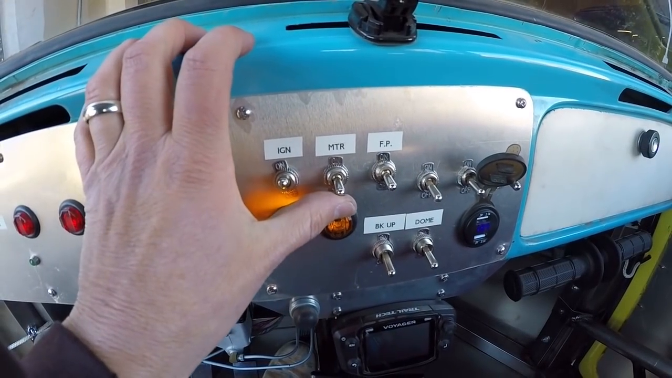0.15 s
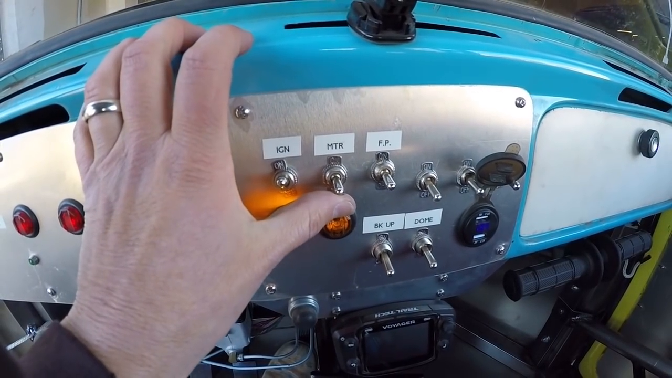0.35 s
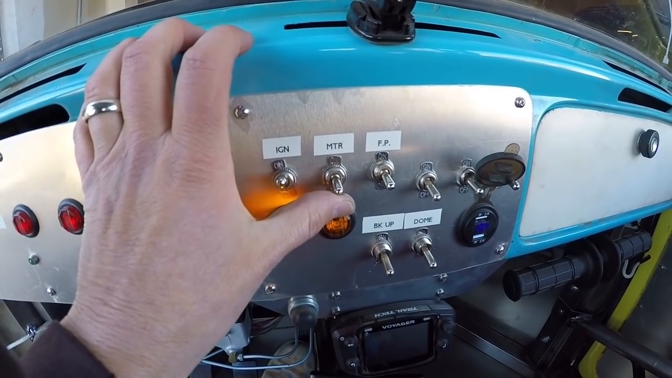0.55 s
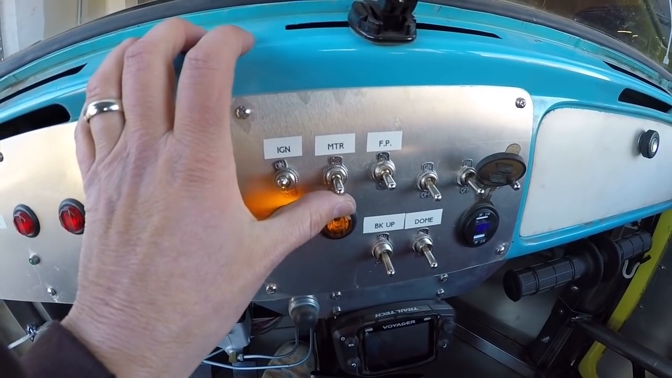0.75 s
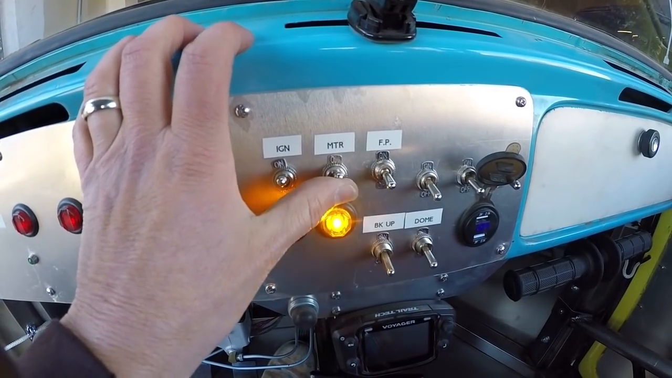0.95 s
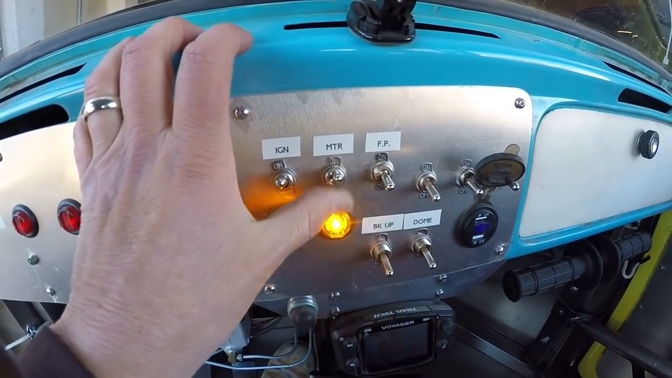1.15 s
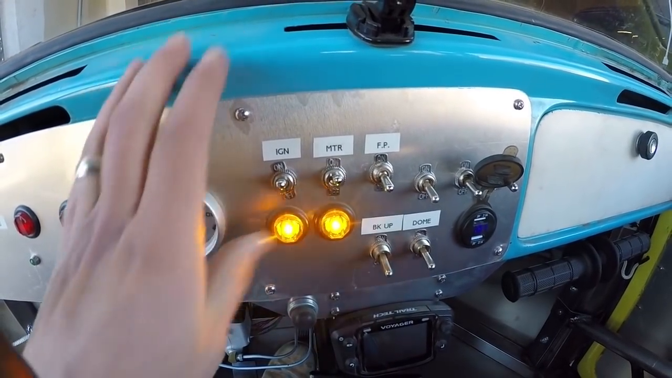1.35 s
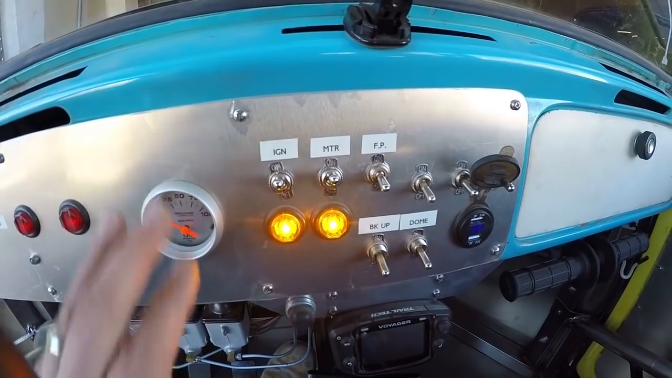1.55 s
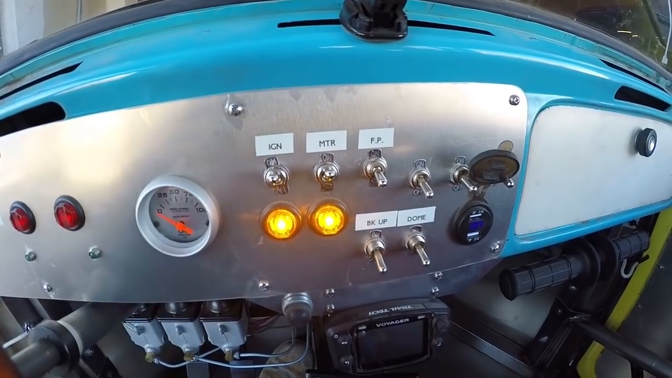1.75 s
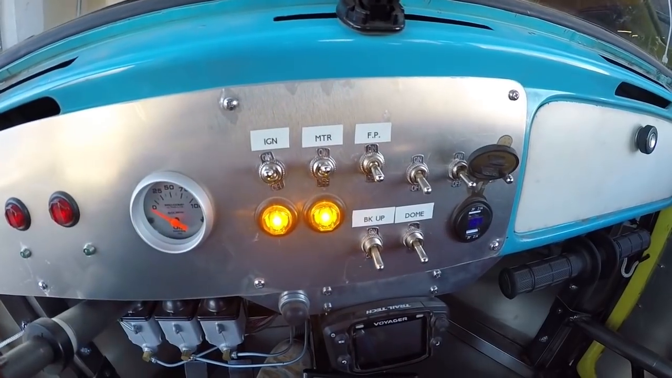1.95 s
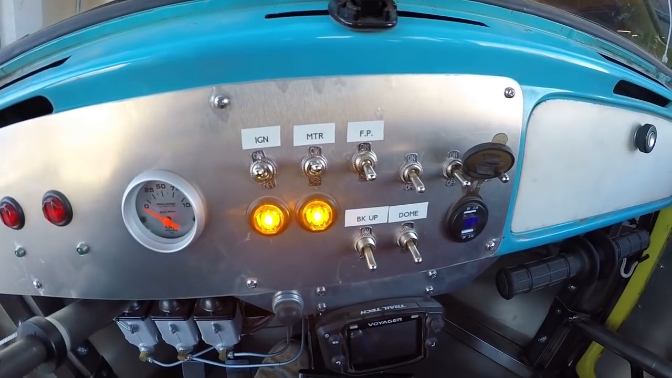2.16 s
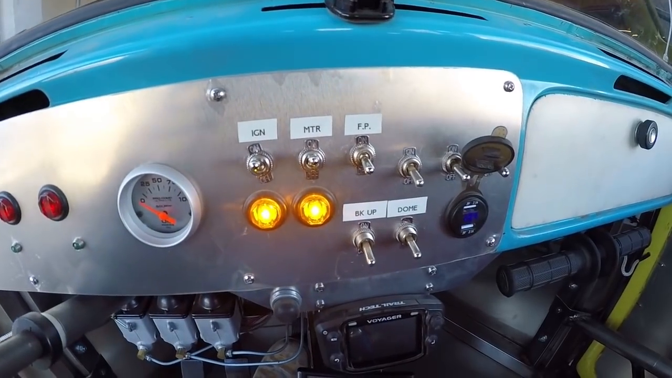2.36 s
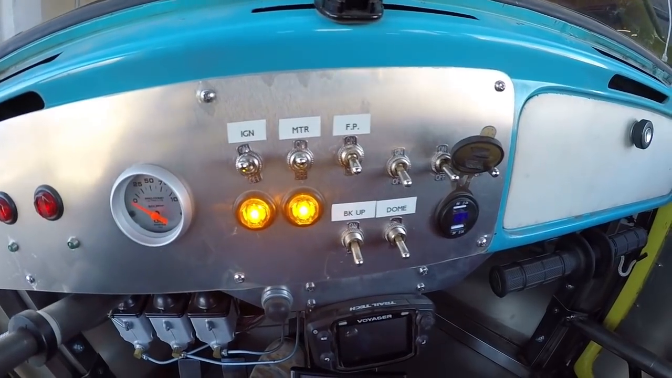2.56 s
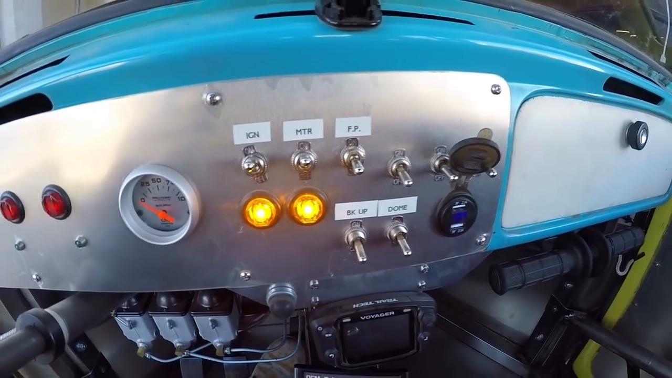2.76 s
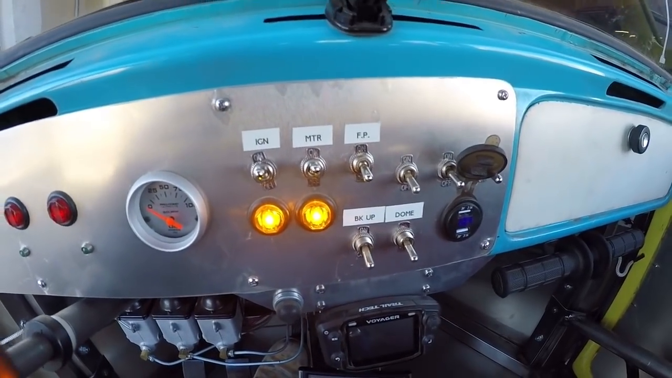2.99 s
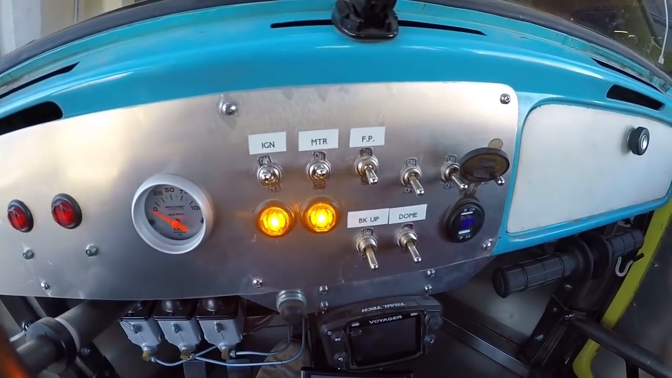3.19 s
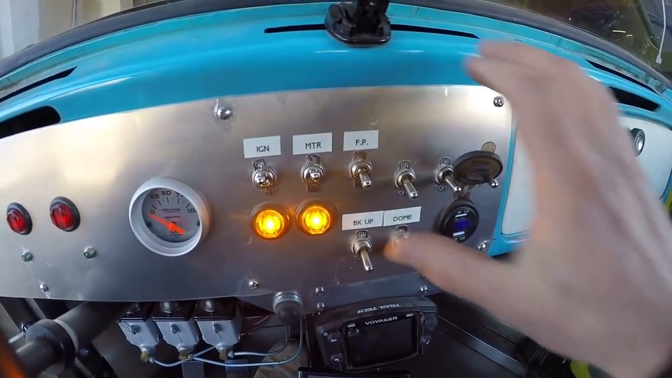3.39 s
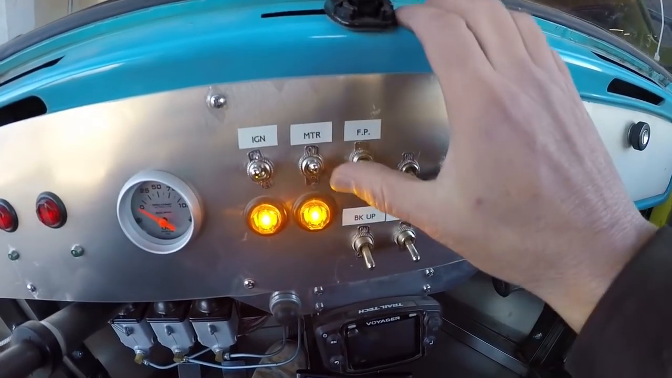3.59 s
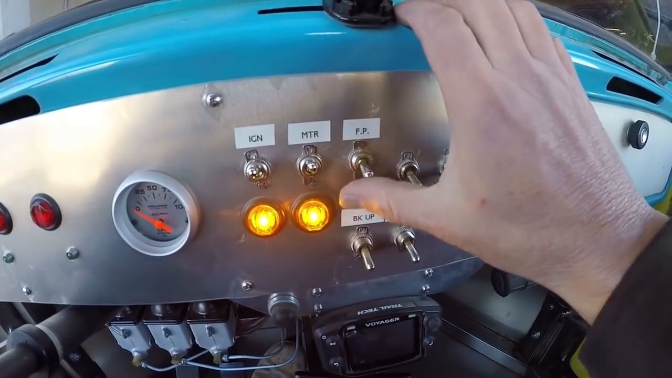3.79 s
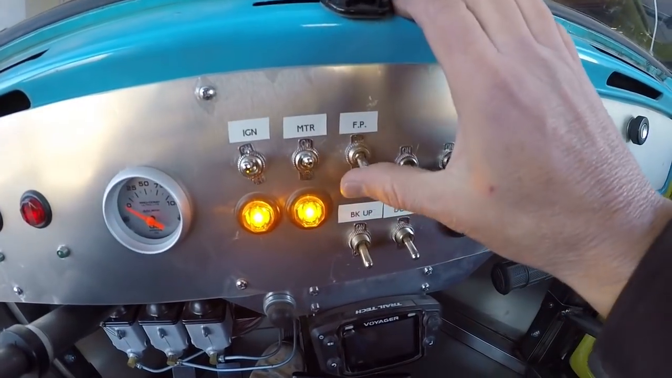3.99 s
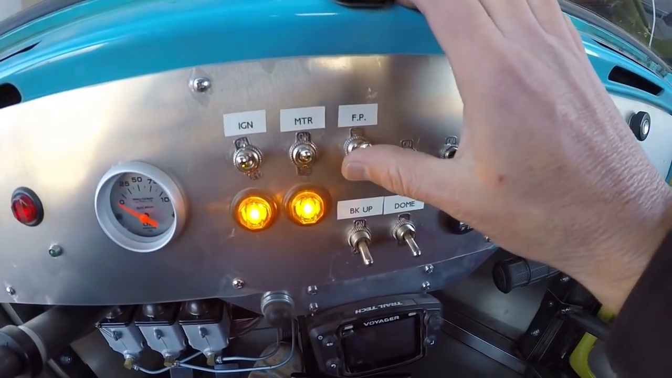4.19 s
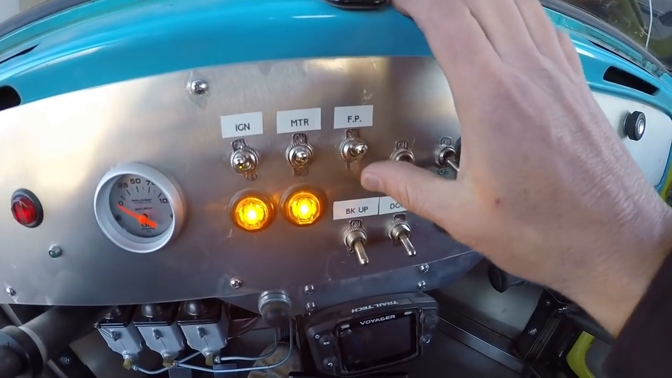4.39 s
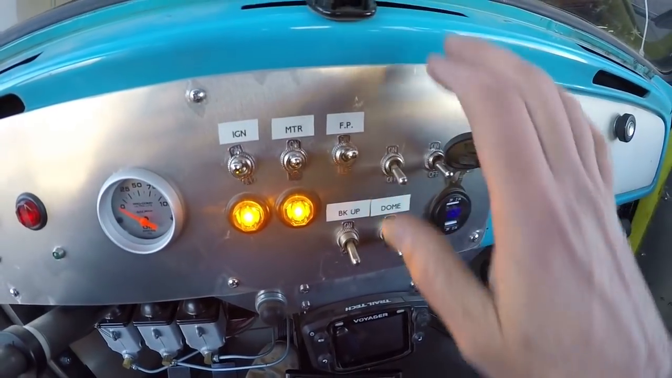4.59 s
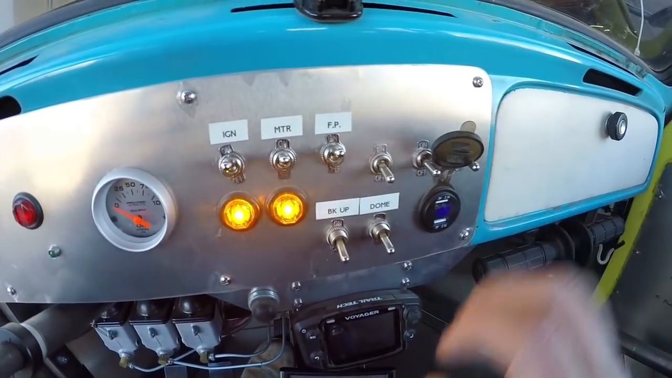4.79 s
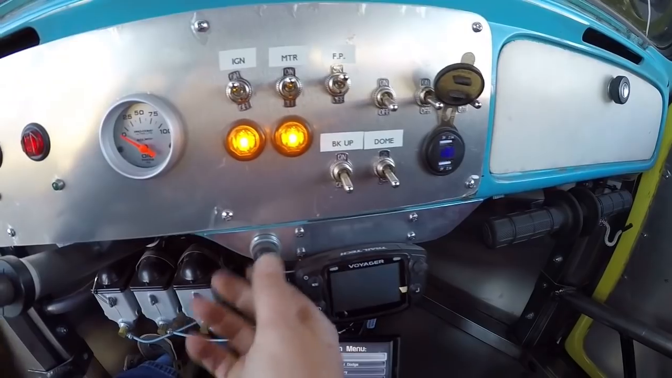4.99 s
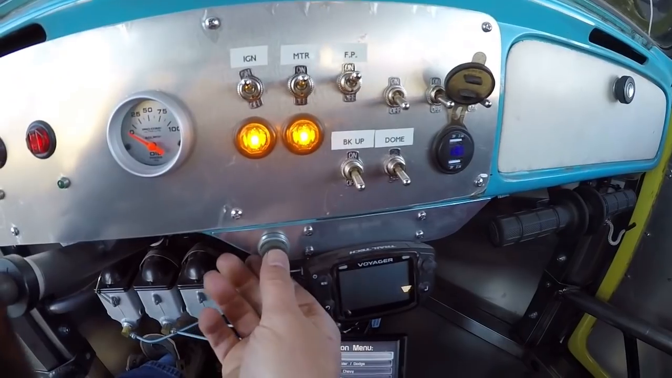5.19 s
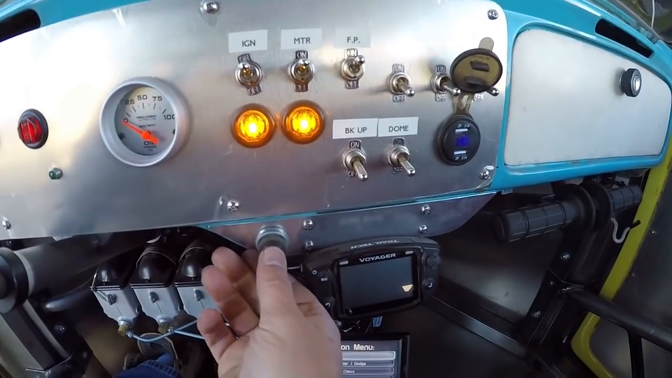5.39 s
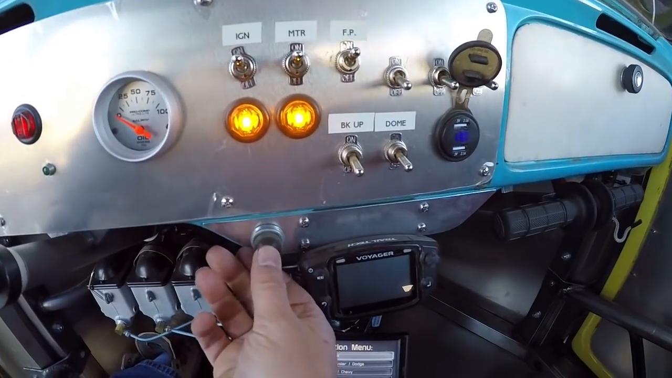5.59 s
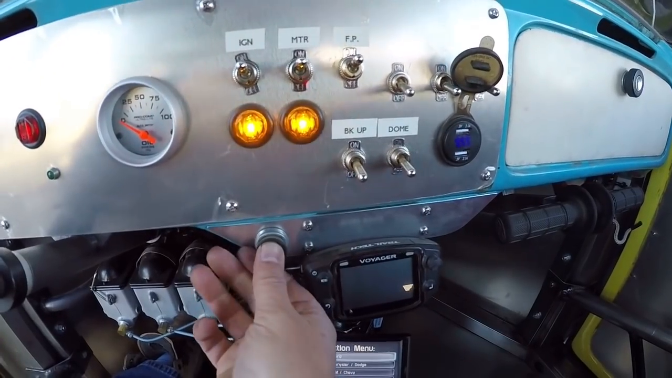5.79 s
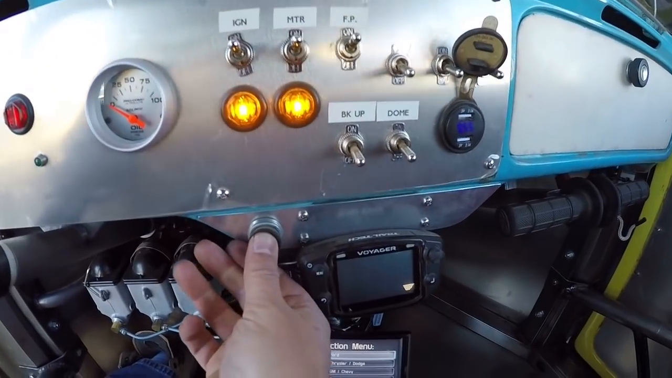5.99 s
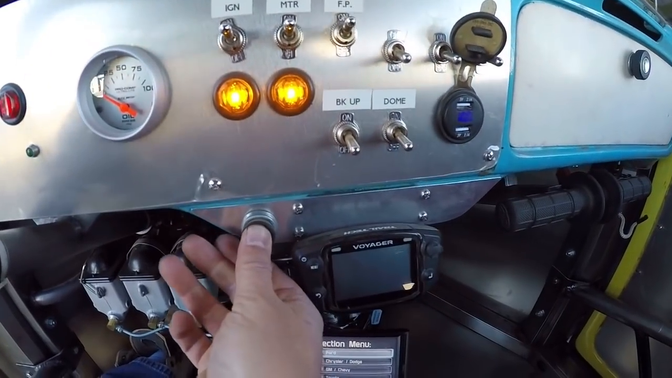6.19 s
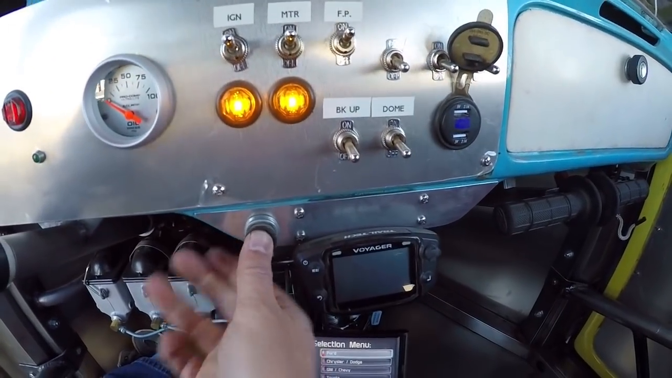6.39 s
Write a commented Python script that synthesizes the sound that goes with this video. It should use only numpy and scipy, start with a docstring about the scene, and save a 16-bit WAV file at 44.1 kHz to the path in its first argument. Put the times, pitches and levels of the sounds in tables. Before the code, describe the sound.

Close inside a small bare-metal car cabin, low rumble and soft body bumps surround a sharp toggle snap with metallic ring. After quiet shuffling, a second switch clicks and a fuel pump hums, whines and hisses, its pitch dropping slightly under pressure. Finally the starter slams in, gears howl in quick waves, and the engine catches with heavy booming that overloads the microphone.

```python
"""First a low air rumble and soft bumps: a driver moves about in a small bare-metal car.
Toggle switches snap on the dash, each a burst of coloured noise with ringing tones.
The second starts a fuel pump, whose hum and whine follow its shaft over hissing noise.
Then the starter slams in, its gears howl up and down with each compression, and the engine catches:
pressure pulses set the body booming, so loud that the microphone clips."""
import sys
import numpy as np
from scipy import signal
from scipy.fft import rfft, irfft, next_fast_len
from scipy.io import wavfile
from scipy.ndimage import uniform_filter1d, map_coordinates

SR = 44100
rng = np.random.default_rng(int(sys.argv[2]) if len(sys.argv) > 2 else 0)


def pcm_store(signal):
    """Save signal as 16-bit PCM."""
    levels = np.round(np.clip(np.atleast_2d(signal), -1, 1) * 32767)
    wavfile.write(sys.argv[1], SR, levels.astype(np.int16).T)


N = 284445
TIME = np.arange(N) / SR
# the starter turns from CRANK_S until the engine catches at CATCH_S
CRANK_S, CATCH_S, CATCH_LENGTH_S = 5.72, 6.27, 0.023

# In every spectrum below, level_db is the relative strength per Hz of bandwidth.
# In every list of ringing tones, t60_s is the time a tone takes to fall by 60 dB.

# pushes on the body from the starter and the compressions: [start_s, level_db, length_s]
KICKS = [(5.69, -8, 0.017), (5.714, -7.5, 0.0055), (5.745, -3.5, 0.0064), (5.79, -3, .009),
         (5.918, 8, 0.026), (6.022, -3, 0.023), (6.148, 1, .02), (6.25, -5, 0.021)]
# pushes from the first firings: [start_s, level_db, length_s]
FIRINGS = [(6.305, 10.9, 0.014), (6.352, 7.6, 0.01), (6.396, 7, 0.0067), (6.428, 5.1, 0.0077)]
# ringing tones of the body and exhaust: [pitch_hz, level_db, t60_s]
BOOM = [(39.8, -8, 0.25), (66, -9.5, 0.075), (107.4, -4, 0.14), (154, -3.5, 0.083), (310, -27, .08)]
# the engine shakes on its mounts: level while cranking, extra once it has caught
SHAKE_DB, SHAKE_CAUGHT_DB = -16, 8.5


def engine():
    """Compressions and then firings set the body booming; the exhaust barks as the engine catches."""
    pushes = pressure_pulses(KICKS) + pressure_pulses(FIRINGS)
    boom = signal.fftconvolve(pushes, ringing(BOOM))[:N]
    boom = high_pass(boom, 24)

    shake = noise([(30, -5.5), (42, -2.5), (65, -6.5), (105, -10), (130, -16)])
    shake = even_out(shake, SR // 12)
    shake_db = SHAKE_DB + SHAKE_CAUGHT_DB * fade_in(CATCH_S, 0.037)

    bark_spectrum = [(150, 0), (420, 0), (950, -5), (2000, -17), (8000, -29)]
    bark = blow(bark_spectrum, t60=0.17, tail_db=-13, rise=0.0038)
    add(boom, 6.424, from_db(-6.5) * bark)
    return boom + fade_in(5.69, .04) * from_db(shake_db) * shake


def pressure_pulses(rows):
    """Smooth pushes of equal area, each scaled by its level."""
    out = np.zeros(N)
    for start_s, level_db, length_s in rows:
        push = np.hanning(int(length_s * SR))
        add(out, start_s, from_db(level_db) * push / push.sum())
    return out


# tones of the gear howl: [multiple of the tooth-mesh rate, level_db]
MESH_ORDERS = [(.5, -14), (1, 1), (1.12, -7.5), (1.5, -15), (1.83, -14), (2, -12), (3, -14), (4, -19)]
# resonances of the bell housing round the gears: [pitch_hz, width_hz, level_db]
HOUSING = [(587, 41, 3), (664, 55, 1.5), (743, 50, -3), (1152, 89, -1.5), (1282, 79, 0), (1474, 116, -2),
           (1690, 60, -1.5), (1970, 42, -5), (2150, 140, -1.5), (2860, 300, -5), (3740, 490, -8),
           (4520, 220, -3)]
# spectra of the block's rumble, the gear clatter and the harsh rasp: [pitch_hz, level_db]
BLOCK = [(53, -38), (90, -6), (118, -0.5), (231, -7.5), (313, -5), (355, -9), (415, -6.5), (534, -9.5),
         (575, -4), (672, -7), (820, -15), (940, -18.5), (1100, -13), (1430, -34), (2420, -120)]
CLATTER = [(530, -39), (900, -15), (972, -14), (1160, -6), (1260, -5), (1510, -3.5), (1570, -10),
           (2140, -6.5), (2370, -20), (2820, -15), (3740, -23), (4800, -22.5), (7000, -33.5), (9100, -65),
           (15400, -120)]
RASP = [(2940, -2), (5000, -3.5), (5610, -11), (8150, -9.5), (10400, -18), (13900, -20), (15700, -30)]
# the solenoid's spectrum: [pitch_hz, level_db]
SOLENOID = [(47, -23), (80, -3), (189, -11), (315, -10.5), (993, -13.5), (2010, -8.5), (2570, -13),
            (5440, -13), (10100, -28.5), (14700, -23), (15700, -30)]
# ringing tones of the solenoid and of the starter mount: [pitch_hz, level_db, t60_s]
SOLENOID_MODES = [(1768, -9.5, 0.15), (2104, -13, 0.23)]
ENGAGE_MODES = [(129, -5, 0.34), (164.3, -2.5, 0.17), (242, -16, 0.093)]
# the pinion grates forward into the ring gear: [start_s, level_db, upper_edge_hz]
PINION = [(5.678, -21.5, 7000), (5.689, -15.5, 9000), (5.696, -10, 7000)]
# spectrum of light metal knocks, shared by the pinion and the dash: [pitch_hz, level_db]
KNOCK_COLOUR = [(200, -1), (400, -2), (900, -1.5), (2800, -4), (6000, -10.5), (15000, -15.5)]


def starter():
    """The pinion slams in; gear teeth howl and clatter while the block turns over."""
    mesh_hz, howl_db, block_db, clatter_db, rasp_db = cranking()
    teeth = np.cumsum(mesh_hz * (1 + .032 * drift(400))) / SR  # teeth met so far
    howl = sum(from_db(db + 3.3 * drift(200)) * np.sin(2 * np.pi * k * teeth) for k, db in MESH_ORDERS)
    # each sweep sets one housing resonance after another howling
    howl = resonate(howl * from_db(howl_db) * fade_in(5.71, 0.018), HOUSING)
    howl = panels(howl, t60=0.17, wet=0.66)

    block = rms_one(panels(noise(BLOCK), t60=.3, wet=1.22))
    block = from_db(block_db) * block * fade_in(5.735, 0.015)

    # the noise swells and dips once every two teeth
    swell = rms_one((1 + 0.57 * np.cos(np.pi * teeth)) * from_db(2 * drift(200)))
    clatter = panels(swell * rng.standard_normal(N), t60=0.13, wet=1.13)
    clatter = from_db(clatter_db) * coloured(clatter, CLATTER)
    rasp = from_db(rasp_db) * panels(swell * noise(RASP), t60=.06, wet=0.72)

    slam = snap(5.7045, SOLENOID, SOLENOID_MODES, level_db=0.5, ring_db=1.5, travel=0.00313,
                lead_db=-5.5, t60=0.11, tail_db=-18, flex_db=-0.5)
    add(slam, 5.714, from_db(2.0) * ringing(ENGAGE_MODES))
    for start_s, level_db, edge_hz in PINION:
        grate = low_pass(blow(KNOCK_COLOUR, t60=0.066, tail_db=-12.5), edge_hz)
        add(slam, start_s, from_db(level_db) * grate)
    return slam + howl + block + (clatter + rasp) * fade_in(CRANK_S, 0.011)


# starter gears run up to speed and are thrown out: [start_s, mean tooth-mesh pitch_hz, howl level_db]
STARTER_SPEED = [(5.70, 250, -45), (5.755, 585, -10), (5.79, 650, -18), (5.83, 745, -16),
                 (5.86, 1140, -8.5), (5.92, 1185, -10), (5.97, 1370, -17), (6.08, 1310, -12.5),
                 (6.28, 1315, -11), (6.33, 1338, -34)]
# once up to speed, each compression slows the gears and loads their teeth
SWING_FROM_S, COMPRESSION_AT_S, COMPRESSION_PERIOD_S = 5.93, 6.165, .104
# share of the speed; louder under load; louder at either end of the swing, where the pitch dwells
SWING_SHARE, LOAD_DB, DWELL_DB = .13, 1.5, 3
# block rumble eases while cranking between surges, and grows as the engine runs up
BLOCK_DB, BLOCK_FADE_DB_PER_S, BLOCK_RUN_UP_DB_PER_S = -15.3, 9, 45
# each kick makes the block rumble surge: dB for a kick of level 0 dB, rise and dying away
SURGE_DB, SURGE_RISE_S, SURGE_T60_S = 6, .025, .6
# clatter: at full speed, per octave of speed, once the engine has caught
CLATTER_DB, CLATTER_DB_PER_OCTAVE, CLATTER_CAUGHT_DB = -16.2, 5, -3.5
SEATING_DB, SEATING_S = 12, .03  # extra clatter while the teeth seat
FULL_MESH_HZ = 1330  # tooth-mesh rate counted as full speed
# rasp: at full speed, per octave of speed, growth from the start of cranking, once the engine has caught
RASP_DB, RASP_DB_PER_OCTAVE, RASP_DB_PER_S, RASP_CAUGHT_DB = -34.5, 7.5, 9.5, 8


def cranking():
    """Tooth-mesh rate (Hz) and levels (dB) of howl, block, clatter and rasp, from speed, load and catch."""
    mean_hz, howl_db = in_time(STARTER_SPEED)
    caught = fade_in(CATCH_S, CATCH_LENGTH_S)
    swing = np.cos(2 * np.pi * (TIME - COMPRESSION_AT_S) / COMPRESSION_PERIOD_S)
    load = fade_in(SWING_FROM_S, 0.0997) * swing
    mesh_hz = mean_hz * (1 - SWING_SHARE * load)
    octaves = np.log2(mesh_hz / FULL_MESH_HZ)
    howl_db = howl_db + LOAD_DB * load + DWELL_DB * (load ** 2 - .5)

    surge = sum(from_db(db - 60 * since(s) / SURGE_T60_S) * fade_in(s, SURGE_RISE_S) for s, db, _ in KICKS)
    block_db = BLOCK_DB + SURGE_DB * surge
    block_db = block_db - BLOCK_FADE_DB_PER_S * since(CRANK_S) + BLOCK_RUN_UP_DB_PER_S * since(CATCH_S)

    seating_db = SEATING_DB * np.exp(-since(CRANK_S) / SEATING_S)
    clatter_db = CLATTER_DB + CLATTER_DB_PER_OCTAVE * octaves + CLATTER_CAUGHT_DB * caught + seating_db
    rasp_db = RASP_DB + RASP_DB_PER_OCTAVE * octaves
    rasp_db = rasp_db + RASP_DB_PER_S * since(CRANK_S) + RASP_CAUGHT_DB * caught
    return mesh_hz, howl_db, block_db, clatter_db, rasp_db


# spectra of the first toggle and of the pump's toggle: [pitch_hz, level_db]
MOTOR_SWITCH = [(47, -29), (80, 0), (216, -6.5), (359, -14), (1020, -6), (1290, -5.5), (1450, -2.5),
                (1610, -6.5), (1930, -2.5), (3270, -4.5), (3580, -7.5), (4360, -6.5), (9250, -22.5),
                (12600, -18), (15700, -28)]
PUMP_SWITCH = [(47, -40), (80, 1), (207, -10.5), (469, -20.5), (638, -11), (870, -20.5), (1290, -11.5),
               (1730, -14), (2100, -9.5), (2350, -15.5), (4180, -10), (5090, -8.5), (6640, -18),
               (7420, -23.5), (15700, -23.5)]
# ringing tones of the two toggles and of the dash panel itself: [pitch_hz, level_db, t60_s]
MOTOR_MODES = [(1068, -21.5, .09), (1540, -19.5, .08), (2120, -22, 0.098), (2606, -20, .08),
               (4350, -14, 0.068)]
PUMP_MODES = [(167, -24.5, 0.31), (1297, -13, 0.076), (1310, -36, .45), (4730, 4, 0.013), (5270, -9, 0.019)]
DASH_MODES = [(154.7, -13, .15), (269.5, 2.5, 0.17), (445, -6.5, 0.16), (542, -12, 0.55),
              (862, -15.5, 0.59)]
# relays and light knocks behind the dash: [start_s, level_db, upper_edge_hz, t60_s]
KNOCKS = [(1.029, -19, 3370, 0.08), (1.134, -31.5, 3400, 0.12), (3.889, -44, 6000, 0.057),
          (4.694, -31, 2800, 0.087)]


def dash():
    """Two toggles, the starter button, and relays and knocks: short noise bursts, most with metal ringing."""
    out = snap(0.96, MOTOR_SWITCH, MOTOR_MODES, level_db=2, ring_db=-1.5, travel=.0018,
               lead_db=-13.5, t60=.06, tail_db=-19, flex_db=-3)
    out += snap(4.0542, PUMP_SWITCH, PUMP_MODES, level_db=-4.0, ring_db=5.0, travel=.0016,
                lead_db=-2.5, t60=0.066, tail_db=-15.5, flex_db=-2)
    button = blow([(400, -6), (4500, -2), (8000, -3), (14000, -8)], t60=0.056, tail_db=-8)
    add(out, 5.663, from_db(-27) * button)
    for start_s, level_db, edge_hz, t60 in KNOCKS:
        rattle = low_pass(blow(KNOCK_COLOUR, t60, tail_db=-6.5), edge_hz)
        add(out, start_s, from_db(level_db) * (rattle + from_db(-3.5) * ringing(DASH_MODES)))
    return out


# tones of the pump's hum: [multiple of the shaft rate, level_db]
PUMP_ORDERS = [(1, 3), (2, -14.5), (3, -23.5), (4, -28.5), (8.18, -29.5), (47, -35), (82, -30), (88, -43),
               (90, -42), (96, -42), (112.2, -35)]
PUMP_VANES, LOW_WHINE_ORDER = 48, 31.2  # multiples of the shaft rate: main whine, fainter lower whine
# spectra of the fuel hiss while the line fills, the hiss under pressure, and the low drone:
# [pitch_hz, level_db]
FUEL_HISS = [(710, -47), (1200, -25), (1600, -22), (2310, -13), (2780, -12), (3090, -10), (4090, -11.5),
             (4810, -11), (4970, -5), (6300, -14), (7480, -10), (12300, -11.5), (15700, -22)]
LOADED_HISS = [(710, -43), (1200, -12), (1770, -20), (2030, -11), (2490, -14.5), (4270, -9), (4660, -8),
               (4970, -13), (10400, -12.5), (13700, -17), (15700, -29)]
PUMP_DRONE = [(65, -20), (110, 0), (130, -14), (219, -11), (264, -24.5), (503, -31), (661, -42), (796, -39),
              (850, -44), (1500, -42.5), (1950, -72), (3300, -120)]
# the pump runs free until the line is full, then slows; the starter drags its supply down
PUMP_ON_S, PUMP_SPIN_UP_S, LINE_FULL_S = 4.06, .015, 4.95
PUMP_FREE_HZ, PUMP_LOAD_DROP_HZ, PUMP_CRANK_DROP_HZ = 97.46, 1.42, 7.7
# base levels of the pump's parts: (running free dB, under pressure dB)
HUM_DB, WHINE_DB, LOW_WHINE_DB, HISS_DB = (-36, -31.7), (-50, -49), (-65, -71), (-49, -51)


def fuel_pump():
    """An unbalanced rotor hums, its vanes whine, fuel hisses; it slows a little once under pressure."""
    pressure = fade_in(LINE_FULL_S, .02)
    spin_up = 1 - .2 * np.exp(-since(PUMP_ON_S) / PUMP_SPIN_UP_S)
    shaft_hz = spin_up * PUMP_FREE_HZ - PUMP_LOAD_DROP_HZ * pressure
    shaft_hz = shaft_hz - PUMP_CRANK_DROP_HZ * fade_in(5.66, 0.11)
    hum_db, whine_db, low_db, hiss_db = [free + (full - free) * pressure
                                         for free, full in (HUM_DB, WHINE_DB, LOW_WHINE_DB, HISS_DB)]

    angle = 2 * np.pi * np.cumsum(shaft_hz * (1 + 0.0004 * drift(30))) / SR
    hum = sum(from_db(db + 2.6 * drift(12)) * np.sin(k * angle) for k, db in PUMP_ORDERS)
    whine = fade_in(PUMP_ON_S, .14) * from_db(whine_db + 1.4 * drift(25)) * np.sin(PUMP_VANES * angle)
    whine += from_db(low_db + 3 * drift(20)) * np.sin(LOW_WHINE_ORDER * angle)

    # the hiss partly repeats on each turn, which gives it a fine buzz
    one_turn = coloured(rng.standard_normal(SR), FUEL_HISS)
    turn_share = angle % (2 * np.pi) / (2 * np.pi)
    buzz = map_coordinates(one_turn, [turn_share * SR / shaft_hz[N * 3 // 4]], order=3)

    # the line resonates; its peaks wander while it fills and change once it is under pressure
    filling = panels(noise(FUEL_HISS), t60=0.032, wet=1.3)
    filling = map_coordinates(filling, [np.cumsum(1 + .012 * drift(7))], order=3)
    loaded = panels(noise(LOADED_HISS), t60=0.034, wet=1.8)
    flow = np.sqrt(1 - pressure) * filling + np.sqrt(pressure) * loaded
    hiss = from_db(hiss_db) * (0.98 * flow + 0.54 * buzz)
    drone = from_db(hiss_db + 14.0) * noise(PUMP_DRONE)  # the flow also shakes the floor pan
    return fade_in(PUMP_ON_S, 0.043) * (from_db(hum_db) * hum + whine + hiss + drone)


# spectrum of the body's rumble: [pitch_hz, level_db]
RUMBLE = [(20, -6), (38, 1.5), (70, -2), (110, -12.5), (180, -25), (350, -41.5)]
# soft bumps of the driver's body: [start_s, peak level_db, upper_edge_hz]
BUMPS = [(.832, -24.5, 168), (1.805, -21.5, 70), (1.921, -16.5, 250), (2.161, -21, 80), (2.377, -21.5, 228),
         (2.497, -21.5, 241), (2.715, -28.5, 190), (2.974, -29, 219.5), (3.236, -25, 217),
         (3.441, -20.5, 180), (3.471, -20.5, 276), (4.77, -21, 200), (4.835, -18.5, 140)]
# hand and sleeve brush the dash: [start_s, length_s, level_db, centre pitch_hz, width_octaves]
# the brushing noise is 18 dB down at twice the width on either side of its centre
BRUSHES = [(1.286, 0.097, -53, 7150, 2.7), (2.57, 0.046, -59.5, 5970, .7), (3.394, .008, -56, 8000, 0.67),
           (3.5, 0.082, -51.5, 6640, 6.6)]
# slips of a brief creak: [start_s, level_db]
CREAK = [(2.841, -41), (2.846, -38), (2.850, -39.5), (2.859, -46)]
# ringing tones of each slip: [pitch_hz, level_db, t60_s]
CREAK_MODES = [(2520, 1, .018), (2850, -2, .012), (3195, 2, .018), (4060, -5, .012)]


def driver():
    """Someone moving in the seat: low noise rumbles and thuds, soft noise brushes, tones creak."""
    out = rocking() * even_out(noise(RUMBLE), SR // 8)
    t = TIME[:SR // 2]
    for start_s, level_db, edge_hz in BUMPS:
        jolt = rng.standard_normal(len(t)) * from_db(-60 * t / 0.08)
        thud = low_pass(low_pass(jolt, edge_hz), edge_hz)  # padding dulls the treble
        add(out, start_s, from_db(level_db) * thud / abs(thud).max())
    for start_s, length_s, level_db, hz, octaves in BRUSHES:
        friction = noise([(hz / 4 ** octaves, -18), (hz, 0), (hz * 4 ** octaves, -18)])
        stroke = np.sin(np.pi * fade_in(start_s, length_s) ** 0.63)
        out += from_db(level_db) * stroke * friction
    for start_s, level_db in CREAK:
        add(out, start_s, from_db(level_db) * ringing(CREAK_MODES) * fade_in(0, .0008)[:SR])
    return out


# the driver shifts in the seat and rocks the body: [start_s, length_s, rumble level_db]
SHIFTS = [(.79, 0.43, -28.5), (1.488, 0.45, -31.5), (2.14, .1, -26.5), (2.32, 0.92, -32.5),
          (3.299, 0.23, -24), (4.036, .82, -29.5)]
SHIFT_ATTACK_S, SHIFT_RELEASE_S = 0.032, 0.097
SITTING_DB = -43  # rumble while the driver keeps still
BUMP_ROCK_DB, BUMP_ROCK_S = -28.5, 0.083  # each bump rocks the body for a moment


def rocking():
    """Strength of the body's rumble: the powers of shifts and bumps add to a quiet base."""
    power = from_db(SITTING_DB) ** 2
    for start_s, length_s, level_db in SHIFTS:
        shift = held(start_s, length_s, SHIFT_ATTACK_S, SHIFT_RELEASE_S)
        power = power + (from_db(level_db) * shift) ** 2
    for start_s, _, _ in BUMPS:
        rock = np.sin(np.pi * fade_in(start_s - .015, BUMP_ROCK_S))
        power = power + (from_db(BUMP_ROCK_DB) * rock) ** 2
    return np.sqrt(power)


# spectrum of the still air in the cabin: [pitch_hz, level_db]
AIR = [(15, -31), (25, 1), (102, -17), (123, -28), (156, -13), (179, -29), (241, -20), (315, -34),
       (381, -30), (555, -36.5), (1350, -40), (1820, -44), (15700, -57)]


def cabin_air():
    """Still air in the cabin: steady noise, mostly low."""
    return from_db(-39.5) * noise(AIR)


def snap(s, spectrum, modes, level_db, ring_db, travel, lead_db, t60, tail_db, flex_db=-5.0):
    """A sprung part lets go with a tick and, after its travel (s), slams into its stop."""
    out = np.zeros(N)
    tick = blow(spectrum, t60=0.012, tail_db=-26.5)
    add(out, s - travel, from_db(level_db + lead_db) * tick)
    crack = high_pass(blow(spectrum, t60, tail_db), 1300)
    # slow bending waves carry the lows: they swell later and ring longer
    flex = low_pass(blow(spectrum, t60=0.11, tail_db=-15, rise=0.0089), 1300)
    hit = from_db(level_db) * (crack + from_db(flex_db) * flex)
    add(out, s, hit + from_db(ring_db) * ringing(modes))
    return out


def blow(spectrum, t60, tail_db, rise=0.0011):
    """Countless panel modes, heard as noise, ring briefly; the cabin carries on after them."""
    t = TIME[:SR]
    panel, air = [coloured(white, spectrum) for white in rng.standard_normal((2, SR))]
    dying = panel * from_db(-60 * t / t60)
    return np.minimum(t / rise, 1) * (dying + from_db(tail_db) * cabin_tail(air))


# how long sound lasts in the bare metal cabin: [pitch_hz, t60_s]
CABIN_T60 = [(60, .4), (250, 0.85), (480, .9), (800, .8), (1150, 0.39), (3000, 0.2), (6000, 0.15),
             (15000, .12)]


def cabin_tail(x):
    """Let one second of noise die away band by band, as sound does in the cabin."""
    centres = np.geomspace(60, 15000, 14)
    place = np.interp(np.log(np.arange(SR // 2 + 1) + 1), np.log(centres), np.arange(len(centres)))
    whole = rfft(x)
    out = 0
    for k, hz in enumerate(centres):
        band = irfft(whole * np.maximum(1 - abs(place - k), 0), SR)  # overlapping triangular bands
        out = out + band * from_db(-60 * TIME[:SR] / at_hz(CABIN_T60, hz))
    return out


def ringing(modes):
    """One second of sine tones, each dying away at its own rate."""
    t = TIME[:SR]
    return sum(from_db(db - 60 * t / t60) * np.sin(2 * np.pi * hz * t) for hz, db, t60 in modes)


def panels(x, t60, wet):
    """Reflections between close metal panels carve fixed narrow peaks into a sound."""
    t = TIME[:SR // 4]
    echoes = rng.standard_normal(len(t)) * from_db(-60 * t / t60)
    reflected = signal.fftconvolve(x, echoes / np.linalg.norm(echoes))[:N]
    return (x + wet * reflected) / np.hypot(1, wet)


def resonate(x, modes):
    """Resonances side by side, each with gain 1 at its top before its level, signs alternating."""
    out = 0
    for k, (hz, width_hz, db) in enumerate(modes):
        r = np.exp(-np.pi * width_hz / SR)
        feedback = [1, -2 * r * np.cos(2 * np.pi * hz / SR), r * r]
        band = signal.lfilter([1, 0, -1], feedback, x + 1e-18)
        out = out + (-1) ** k * from_db(db) * (1 - r * r) / 2 * band
    return out


def noise(spectrum):
    """Steady coloured noise with average strength (rms) 1."""
    return coloured(rng.standard_normal(next_fast_len(N)), spectrum)[:N]


def coloured(x, spectrum):
    """Give a signal a spectrum that falls away past its ends; rms 1."""
    hz = np.arange(len(x) // 2 + 1) * SR / len(x) + 1e-3
    low_skirt = 1 + (.85 * spectrum[0][0] / hz) ** 8
    high_skirt = 1 + (hz / spectrum[-1][0] / 1.15) ** 8
    gain = from_db(at_hz(spectrum, hz)) / np.sqrt(low_skirt * high_skirt)
    return rms_one(irfft(rfft(x) * gain, len(x)))


def at_hz(points, hz):
    """Read a table between its points on a log-frequency axis."""
    f, value = np.transpose(points)
    return np.interp(np.log(hz + 1e-3), np.log(f), value)


def in_time(rows):
    """Each column of a curve at every sample."""
    s, *columns = np.transpose(rows)
    return [np.interp(TIME, np.sort(s), c) for c in columns]


def drift(rate):
    """Slow chance: random values at this many per second, spread about 1, joined by lines."""
    return np.interp(TIME * rate, np.arange(8000), rng.standard_normal(8000))


def low_pass(x, hz):
    """Take off the treble, second order."""
    return signal.sosfilt(signal.butter(2, min(hz, .45 * SR), fs=SR, output="sos"), x)


def high_pass(x, hz):
    """Take off the bass, second order."""
    return signal.sosfilt(signal.butter(2, hz, "high", fs=SR, output="sos"), x)


def rms_one(x):
    """Scale to rms 1."""
    return x / np.sqrt(np.mean(x ** 2) + 1e-20)


def even_out(x, samples):
    """Divide a sound by its own running rms, so its level stays steady."""
    return x / np.sqrt(uniform_filter1d(x ** 2, size=samples))


def from_db(db):
    """Decibels to gain."""
    return 10 ** (np.asarray(db) / 20)


def fade_in(start, length):
    """A ramp from 0 to 1."""
    return np.clip((TIME - start) / length, 0, 1)


def held(start, length, attack, release):
    """Attack, hold and release."""
    return fade_in(start, attack) * (1 - fade_in(start + length, release))


def since(start):
    """Seconds gone by since a moment, 0 before it."""
    return np.maximum(TIME - start, 0)


def add(out, s, sound):
    """Mix a sound in at time s."""
    i = int(s * SR)
    out[i:i + len(sound)] += sound[:max(N - i, 0)]


def scene():
    """All sources added together at one microphone."""
    return (engine() + starter() + dash() + fuel_pump() + driver() + cabin_air())[None]


def record(dry):
    """Loud peaks clip at full scale; a steep filter then cuts everything above 15.8 kHz."""
    clipped = np.clip(dry, -1, 1)
    return signal.sosfilt(signal.ellip(10, .1, 85, 15800, fs=SR, output="sos"), clipped)


dry = scene()
out = record(dry)
pcm_store(out)
```